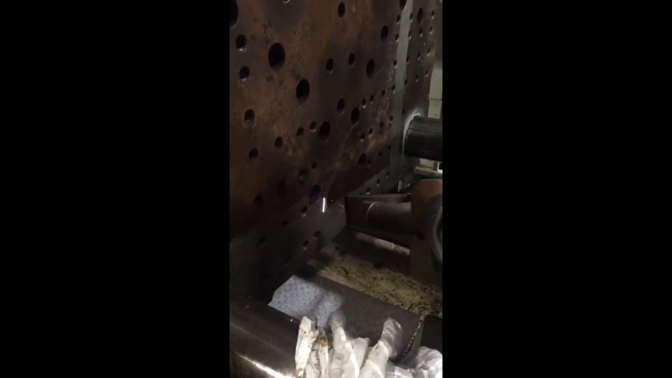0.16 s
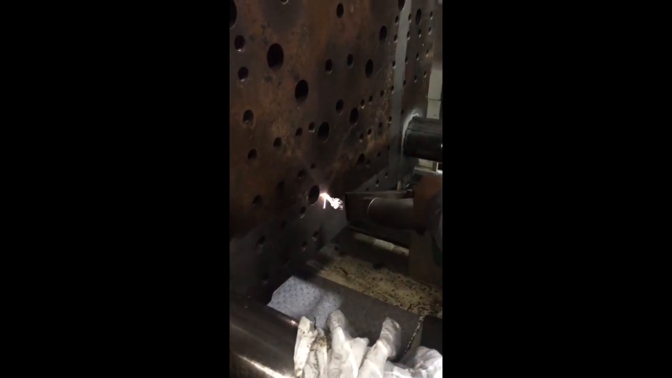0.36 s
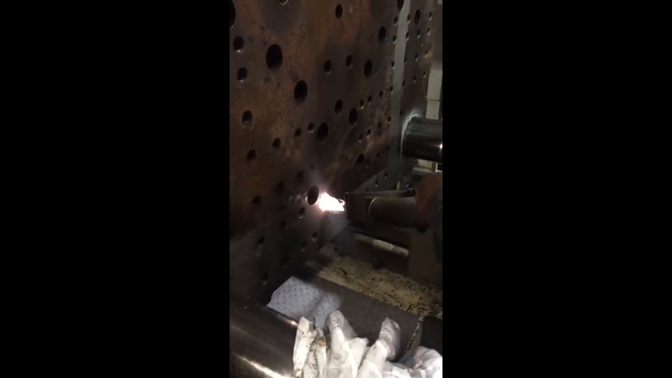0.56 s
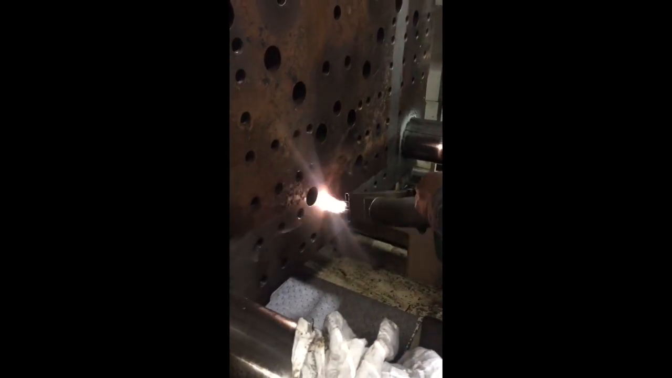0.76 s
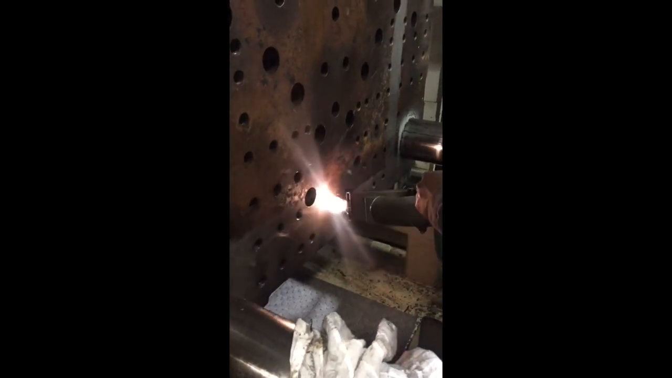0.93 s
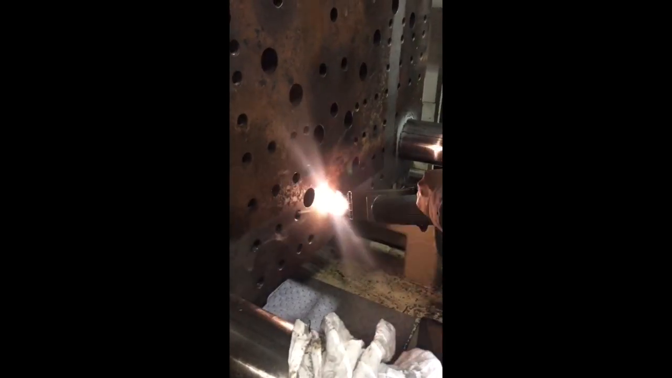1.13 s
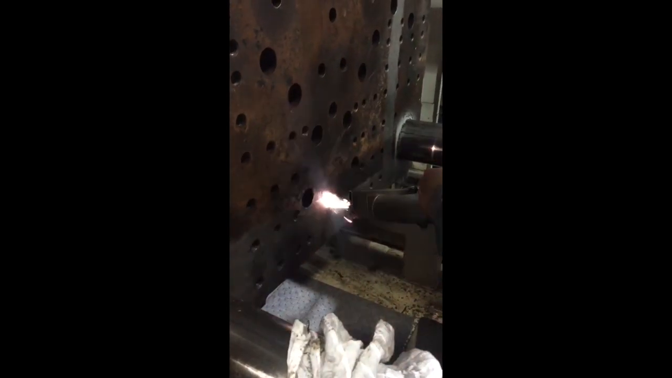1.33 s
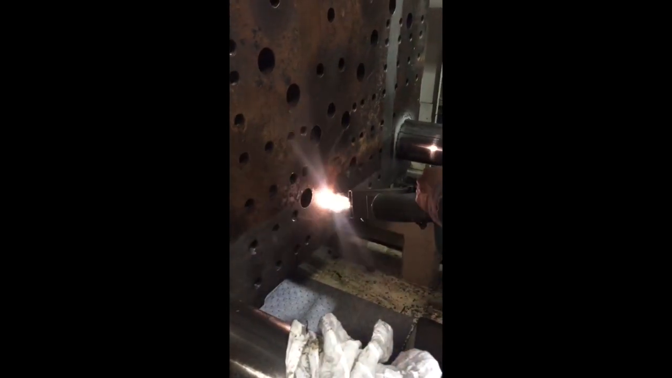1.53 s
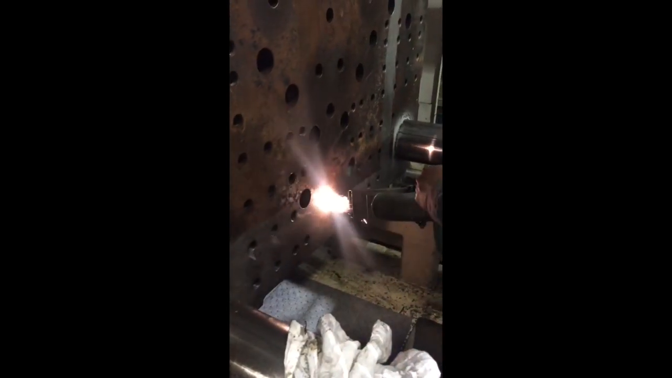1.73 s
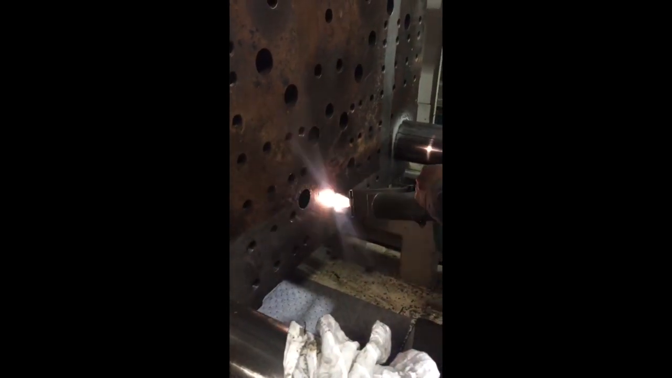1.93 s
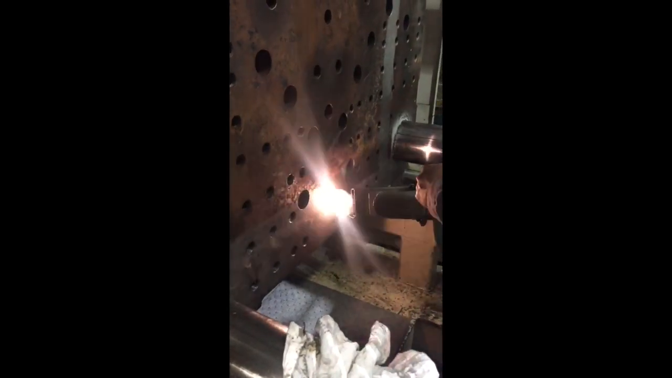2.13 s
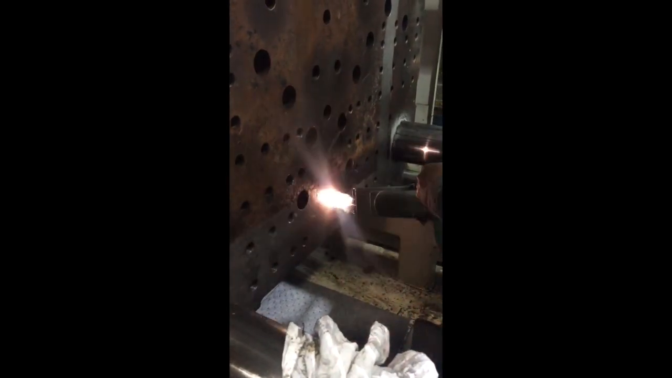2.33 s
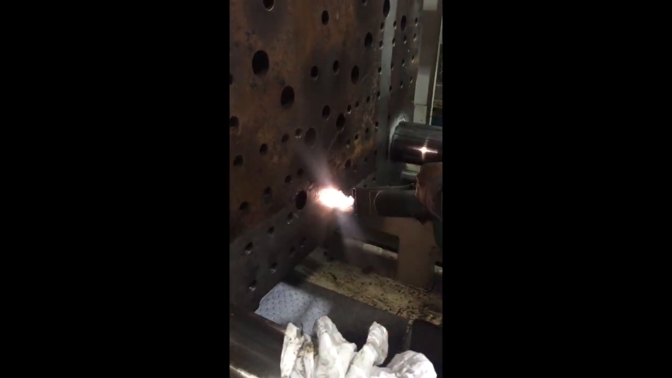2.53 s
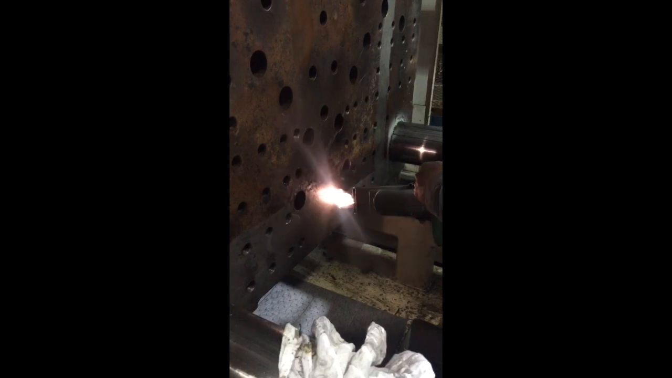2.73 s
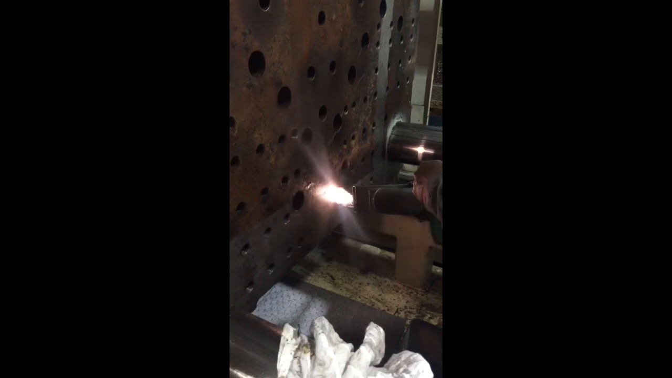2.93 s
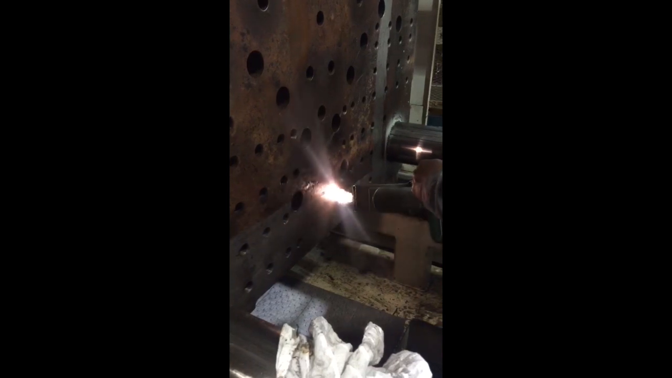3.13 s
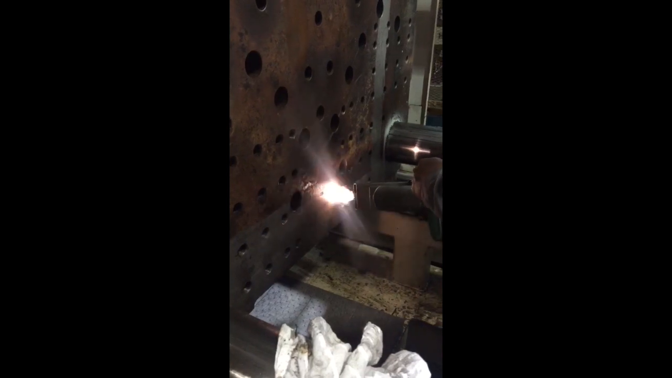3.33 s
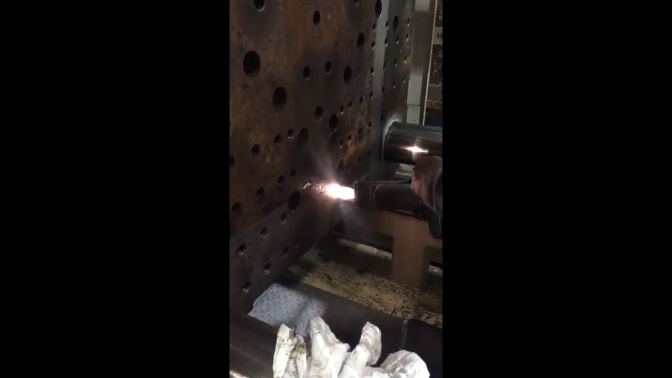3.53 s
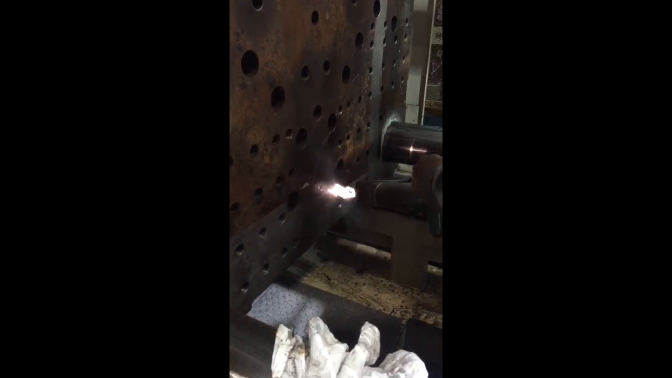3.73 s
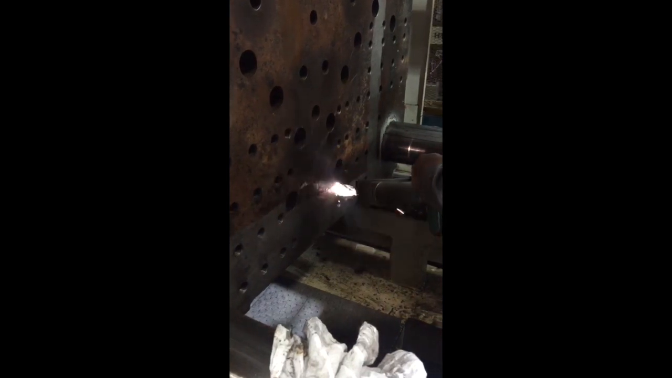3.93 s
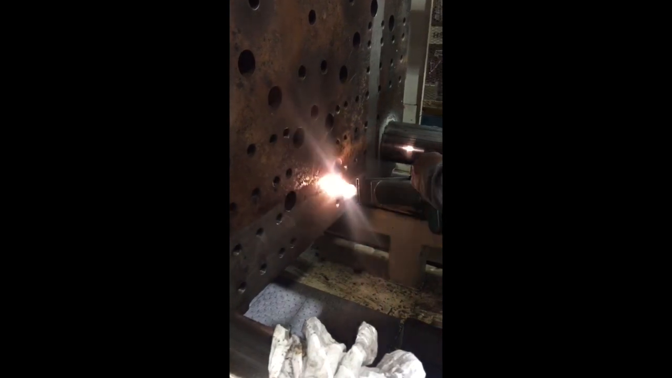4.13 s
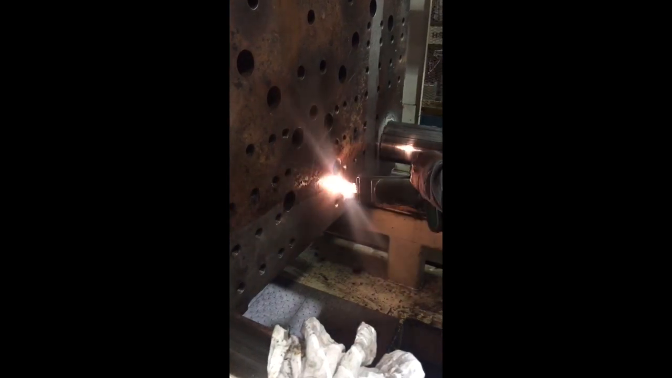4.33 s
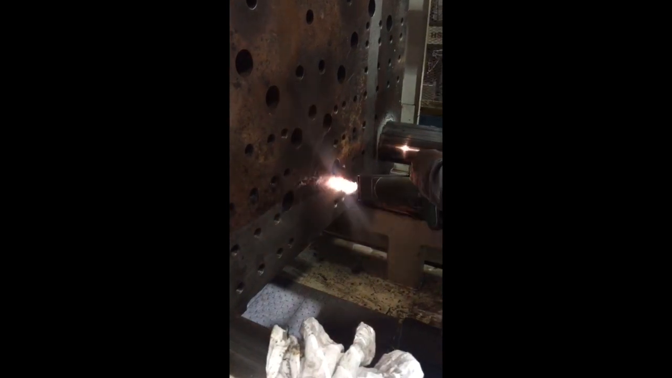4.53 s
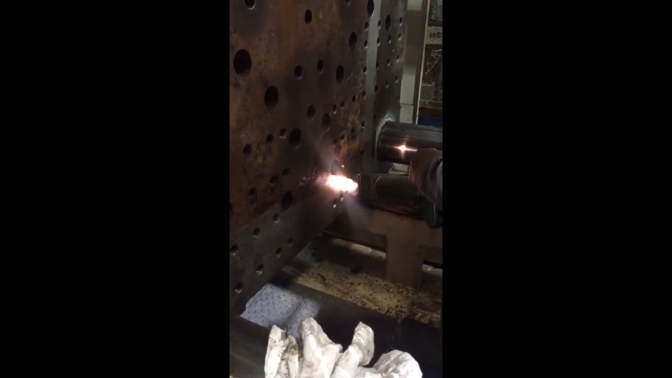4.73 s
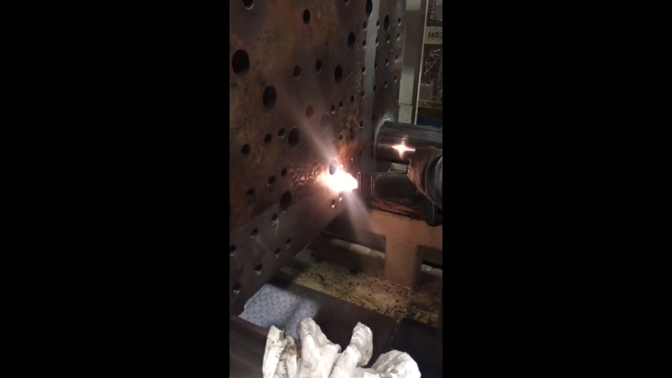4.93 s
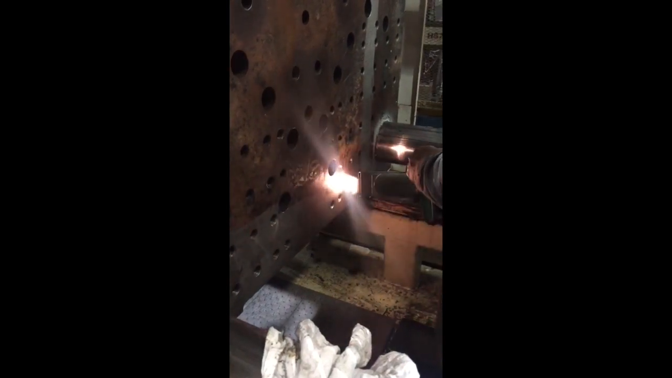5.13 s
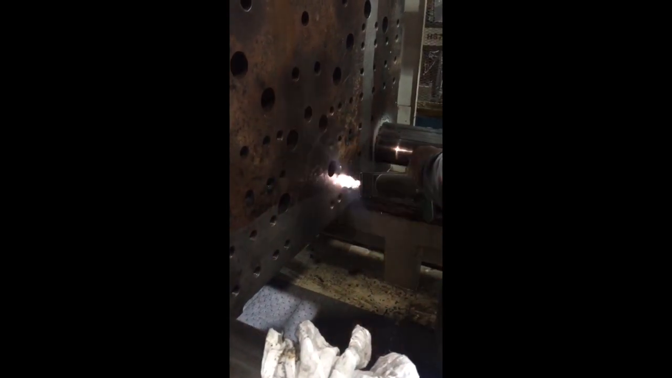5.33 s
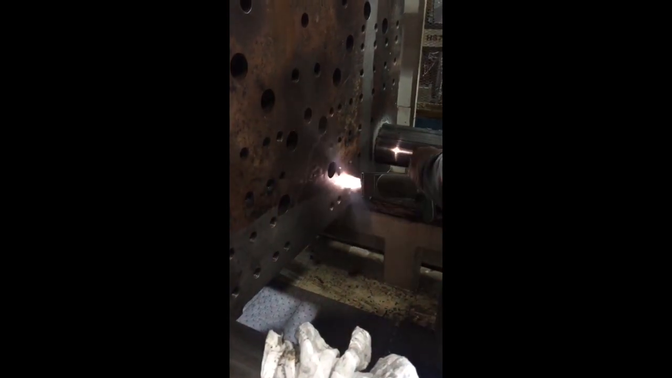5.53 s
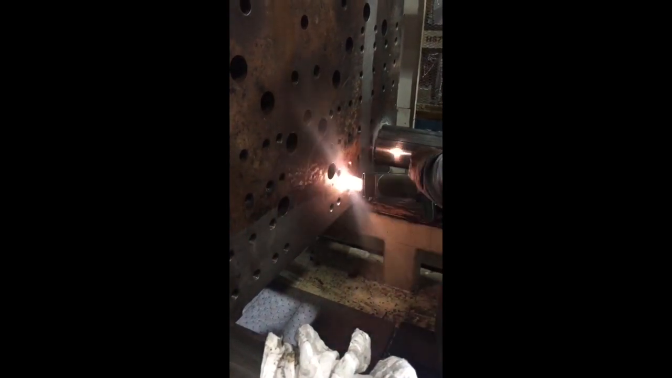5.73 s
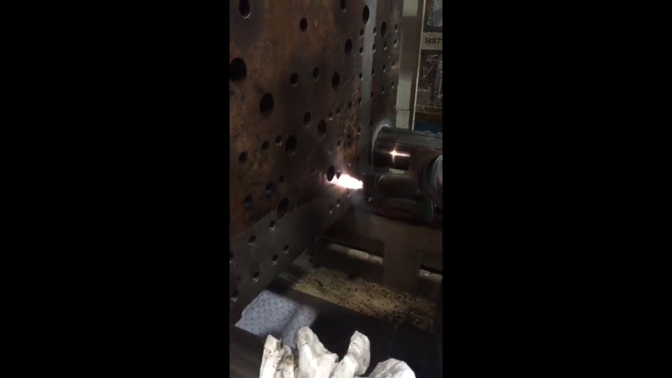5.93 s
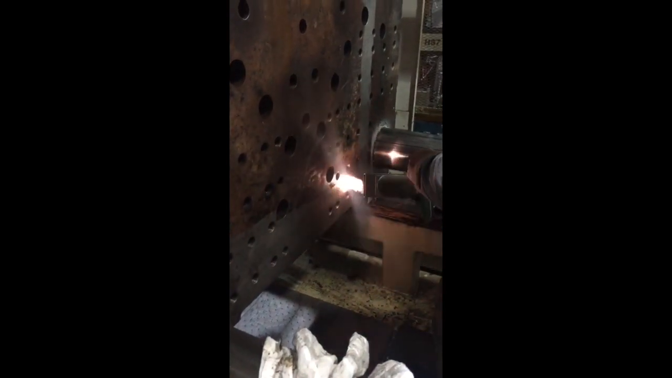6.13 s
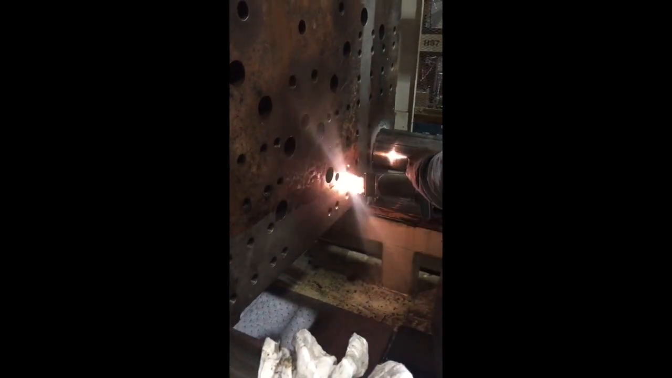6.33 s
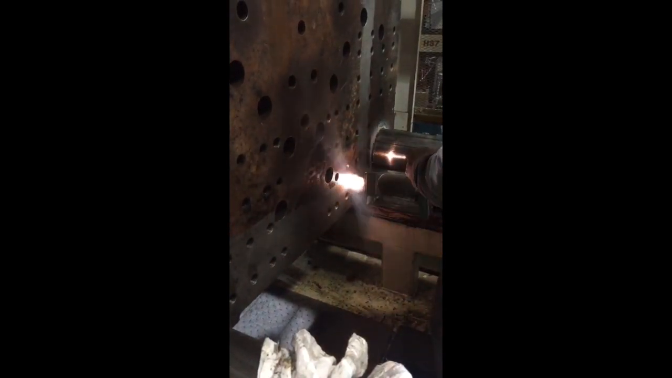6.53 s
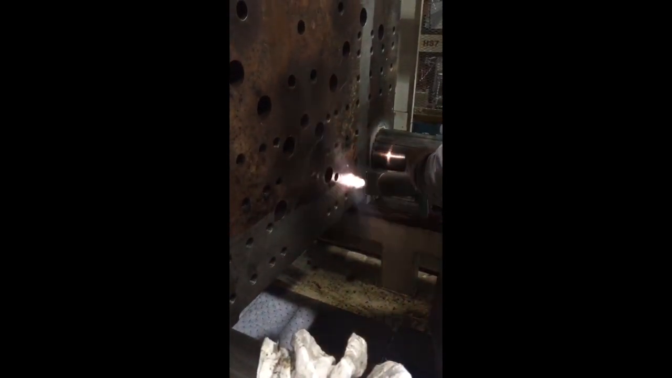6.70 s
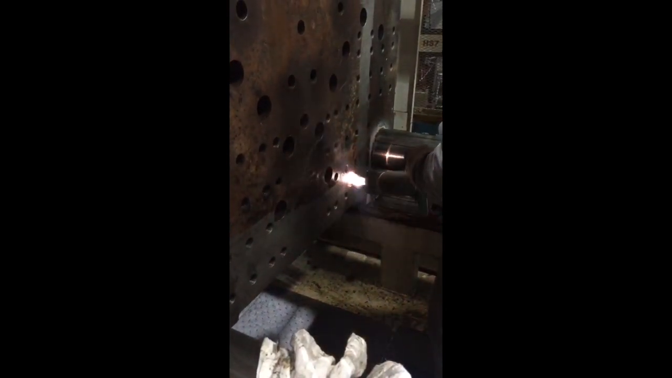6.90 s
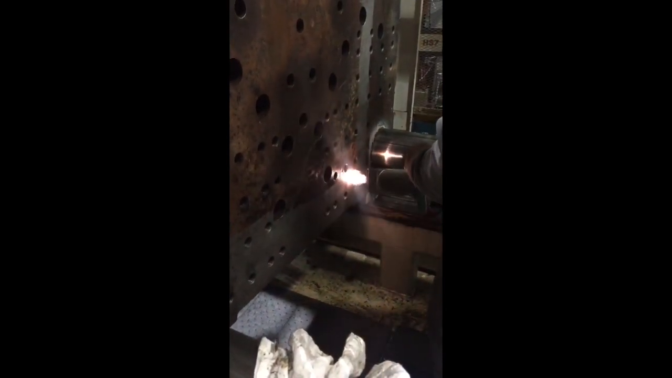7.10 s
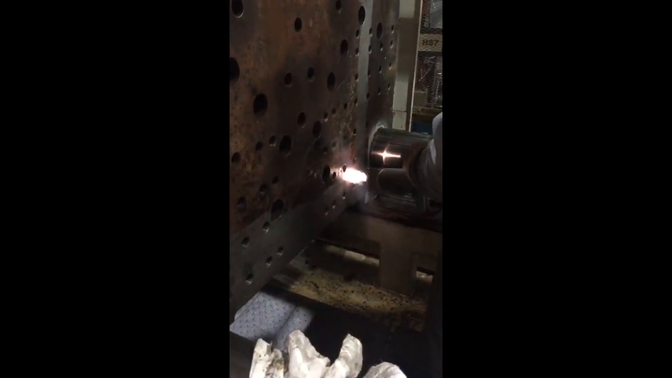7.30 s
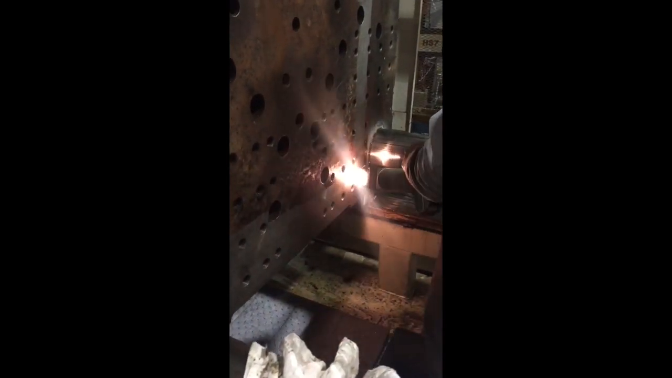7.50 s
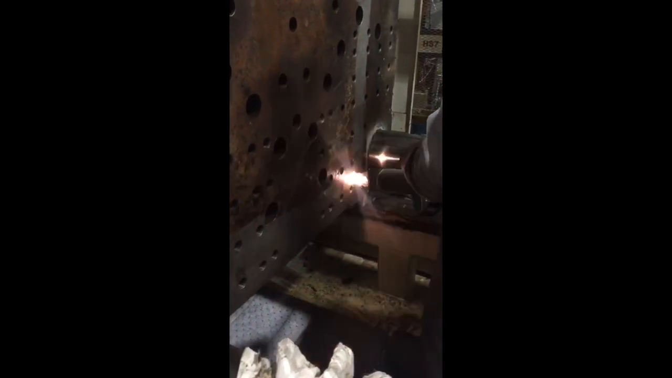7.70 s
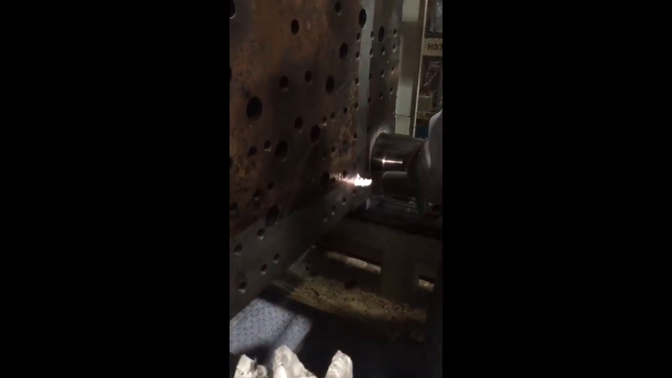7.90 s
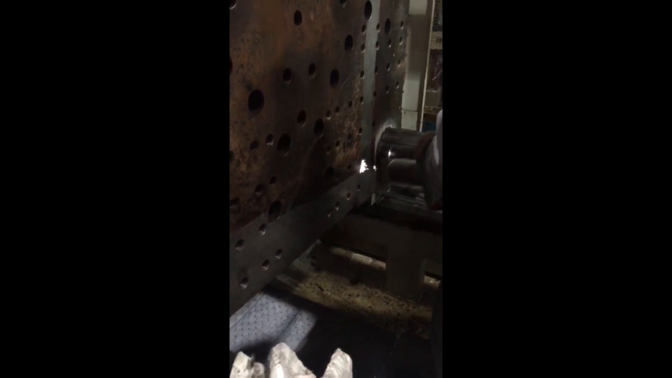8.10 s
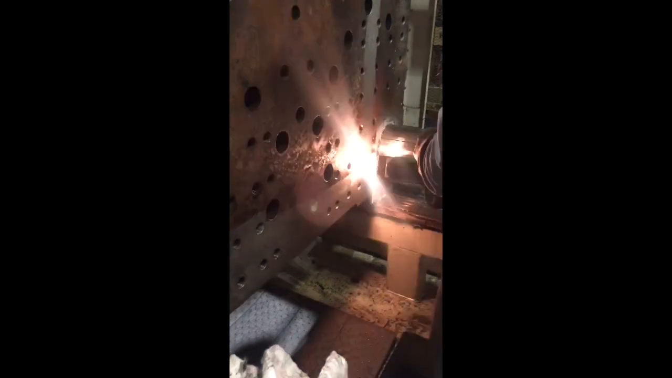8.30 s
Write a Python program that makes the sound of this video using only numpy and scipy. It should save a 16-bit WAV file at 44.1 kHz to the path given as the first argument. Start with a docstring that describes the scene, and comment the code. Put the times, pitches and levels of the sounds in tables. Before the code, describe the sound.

Very close in a nearly dry workshop, a handheld laser strips rust from steel. At 0 s a few short, shrill buzzing bites fade beneath rushing air and low wind buffeting; by 0.3 s the hiss is strong and hard rapid snaps and buzzing pulses begin. From 0.5 s a piercing whine near 10 kHz dominates, chopped about forty times a second into a harsh rasp, with fine sizzle, crackle and snaps. It is strongest around 0.6-1.2 s, with a dull knock at 1 s, while the air eases. Through 1.3-6 s it surges and dips irregularly over resonant hiss, faint machine tones and airy whistling. A loud flare and clustered knocks come at 6.35 s. More swells follow around 7.5 s, then the whine thins and stops at 8 s, leaving hiss. Air rises, buzzing bites return at 8.2 s, and a loud final flare with soft knocks ends near 8.45 s.

```python
"""Laser rust removal in a workshop

A hand-held pulsed laser strips rust from a steel plate. Each pulse pops off a speck of rust, so the pulse
rate sings as a high whine; a mirror sweeps the spot to and fro forty times a second and chops it into a buzz.
Shaped noise makes the air's hiss and rumble, the sizzle and sparks; filtered clicks make snaps at the turns;
sines make faint machine tones and, falling in pitch, a few dull knocks."""
import sys
import numpy as np
from scipy import signal
from scipy.fft import rfft, irfft, next_fast_len
from scipy.io import wavfile
from scipy.ndimage import uniform_filter1d, map_coordinates

SR = 44100
rng = np.random.default_rng(int(sys.argv[2]) if len(sys.argv) > 2 else 0)


def bounce(signal):
    """Save signal as a 16-bit WAV file at the path given by the first command-line argument."""
    frames = np.transpose(np.atleast_2d(signal))
    limited = np.clip(frames, -1, 1)
    pcm = np.round(limited * 32767).astype(np.int16)
    wavfile.write(sys.argv[1], SR, pcm)


N = 373086
TIME = np.arange(N) / SR


def from_db(db):
    """Level law: decibels to amplitude gain."""
    return 10 ** (np.asarray(db) / 20)


def rms_one(x):
    """Normalisation: scale to unit root mean square."""
    return x / np.sqrt(np.mean(np.abs(x) ** 2) + 1e-20)


def in_time(rows):
    """Linear interpolation: the columns after time, at every sample."""
    s, *columns = np.transpose(rows)
    return [np.interp(TIME, s, column) for column in columns]


def low_pass(x, hz, order=2):
    """Butterworth low-pass: a maximally flat pass band."""
    sections = signal.butter(order, min(hz, .45 * SR), fs=SR, output="sos")
    return signal.sosfilt(sections, x)


def coloured(x, spectrum, boosts=()):
    """Spectral shaping: a smooth spectrum with resonant bumps, scaled to rms 1."""
    size = next_fast_len(N)
    hz = np.maximum(np.arange(size // 2 + 1) * SR / size, 1)
    points = np.array(spectrum)
    # silent below the first point, level above the last
    db = np.interp(np.log(hz), np.log(points[:, 0]), points[:, 1], left=-np.inf)
    for centre_hz, width_hz, boost_db in boosts:
        db = db + boost_db / (1 + (2 * (hz - centre_hz) / width_hz) ** 2)
    return rms_one(irfft(rfft(x, size) * from_db(db), size)[:N])


def drift(per_s):
    """Slow random modulation: normal values of spread 1, joined by straight lines."""
    values = rng.standard_normal(1000)
    return np.interp(TIME * per_s, np.arange(len(values)), values)


def swell(s, db, half_length_s):
    """Gaussian envelope: the power of a bell-shaped rise and fall."""
    return from_db(db) ** 2 * np.exp(-np.minimum(((TIME - s) / half_length_s) ** 2, 40))


def workshop(x, wet_db=-24, t60=0.18):
    """Diffuse reverberation: exponentially decaying noise as a faint room tail."""
    age = TIME[:SR // 2]
    tail = rng.standard_normal(len(age)) * from_db(-60 * age / t60) * (age > .01)
    return x + from_db(wet_db) * signal.fftconvolve(x, tail / np.linalg.norm(tail))[:N]


# gusts of the air stream: (time [s], peak level [dB])
GUST_PEAKS = [(0, -46), (.23, -41.5), (.6, -38.5), (1.28, -43.5), (1.87, -43.5), (2.45, -47), (3.92, -53.5),
              (4.2, -54), (5.45, -57), (6.85, -57), (7.4, -53), (8.2, -53)]
GUST_ATTACK_S, GUST_HOLD_S, GUST_RELEASE_DB_PER_S = 0.008, 0.24, 148


def gusts():
    """Wind buffeting of the microphone: each gust's gain comes quickly, holds and dies away."""
    total = np.zeros(N)
    for s, db in GUST_PEAKS:
        attack = np.clip((TIME - s) / GUST_ATTACK_S, 0, 1)
        release_s = np.maximum(TIME - s - GUST_HOLD_S, 0)
        total += attack * from_db(db - GUST_RELEASE_DB_PER_S * release_s)
    return total


# the gap opens as the tool is drawn back, and its resonances sink: (time [s], pitch factor before wander [ratio])
GAP_PITCH = [(0, 1.01), (.2, 1), (.42, 1.004), (1.2, 1.003), (6.3, 1), (7.6, 1.02), (8.02, 1), (8.18, .99),
             (8.3, 0.94), (8.4, 0.99)]


def retuned(x, wander=0.005):
    """Cavity tuning: resampling shifts a noise's resonances as the gap changes."""
    speed = in_time(GAP_PITCH)[0] + wander * drift(2)
    return map_coordinates(x, [np.cumsum(speed)], order=3, mode="mirror")


# how the tool is held: (time [s], slant [0 = square, 1 = slanted])
TOOL_SLANT = [(1.0, 0.019), (3.5, 0.42), (6.3, 0.34), (7.0, 0.88), (7.9, 1.0), (8.2, 0.99), (8.35, 0.99)]
# air over the plate, before the trims in air(): (time [s], rush level [dB], hiss level [dB])
AIR_LEVELS = [(0.0, -42.5, -39.5), (0.16, -45, -40), (.245, -41.5, -35.5), (0.33, -39.5, -33),
              (0.64, -41, -36.5), (1.07, -50.5, -46.5), (1.3, -52, -49.5), (2.35, -56, -52.5),
              (2.87, -56, -53.5), (3.65, -55.5, -50.5), (5.07, -50, -48), (6.1, -53.5, -51.5),
              (6.39, -50.5, -49.5), (6.6, -55.5, -50), (7.63, -52, -47.5), (7.82, -56, -51.5),
              (8.19, -48.5, -41.5), (8.3, -45, -44), (8.46, -52, -47.5)]
# a whistling band of the air stream, before its trim: (time [s], level [dB])
WHISTLE_LEVELS = [(0, -55), (1.2, -57), (2.5, -56), (3.3, -50), (4.2, -45), (5.0, -45), (5.25, -48),
                  (5.5, -47), (6.3, -43.5), (6.5, -52), (6.9, -44.5), (7.8, -54.5), (8.22, -37.5),
                  (8.35, -56)]
# spectra of the air's low rumble: (frequency [Hz], relative level per Hz [dB])
RUMBLE_SPECTRUM = [(24, -45), (40, -9), (65, -1), (85, 2.5), (105, -2.5), (130, 2), (200, -3), (300, -10.5),
                   (500, -18), (1200, -33.5)]
# of its rush: (frequency [Hz], relative level per Hz [dB])
RUSH_SPECTRUM = [(150, -0.5), (350, 1), (650, 5), (1000, 1), (1400, -5.5), (1900, -1), (3000, -64),
                 (6000, -47)]
# of its hiss, before the gap's resonances: (frequency [Hz], relative level per Hz [dB])
HISS_SPECTRUM = [(800, -9.5), (1800, -7), (2500, -3), (3700, 0), (5100, -4.5), (6600, -4), (8500, 8),
                 (10500, 6), (12500, -3), (15500, -1.5)]
# of its whistling band: (frequency [Hz], relative level per Hz [dB])
WHISTLE_SPECTRUM = [(6300, -32), (6850, -6), (7180, 2), (7550, -11), (7950, -8), (8500, -23)]
# gap resonances, tool square, before retuning: (frequency [Hz], width [Hz], boost [dB])
SQUARE_GAP_MODES = [(974, 130, 13.5), (1296, 200, 13.5), (2150, 250, -3), (3080, 300, 14.5),
                    (3750, 400, -2.5), (4350, 320, 12.5), (4740, 210, 8.5), (5020, 200, -2),
                    (5380, 280, 10.5), (5800, 200, 1), (6230, 440, 11.5), (7160, 180, 4.5), (8500, 300, 3),
                    (10800, 600, -3.5), (12000, 450, 9.5)]
# gap resonances, tool slanted, before retuning: (frequency [Hz], width [Hz], boost [dB])
SLANTED_GAP_MODES = [(2200, 249, -5), (2500, 110, 6.5), (3040, 270, 9), (3720, 510, -6), (4400, 210, 6),
                     (4870, 82, 12), (4980, 130, -6), (5440, 350, 13.5), (5940, 220, 3), (6270, 240, 10.5),
                     (6660, 140, 10), (7900, 170, 6), (9100, 1500, 1), (11100, 400, -9), (11550, 250, 8),
                     (12160, 350, 8)]


def air(rumble_db=2.5, rush_db=-2.5, hiss_db=4.0, whistle_db=-3.0, lumpy_db=1.0, rush_uneven_db=1.8):
    """Turbulent jet noise: rumble on the plate, in step with its rush, and hiss resonating in the nozzle gap."""
    rush_level, hiss_level = in_time(AIR_LEVELS)
    slant = np.clip(in_time(TOOL_SLANT)[0], 0, 1)
    white = rng.standard_normal((5, N))

    rumble_gain = np.hypot(from_db(rush_level + rumble_db), gusts()) * from_db(lumpy_db * drift(25))
    rumble = rumble_gain * coloured(white[0], RUMBLE_SPECTRUM)
    rush_gain = from_db(rush_level + rush_db + rush_uneven_db * drift(14))
    rush = rush_gain * coloured(white[1], RUSH_SPECTRUM)

    # equal-power blend of the two ways of holding the tool
    square = np.sqrt(1 - slant) * coloured(white[2], HISS_SPECTRUM, SQUARE_GAP_MODES)
    slanted = np.sqrt(slant) * coloured(white[4], HISS_SPECTRUM, SLANTED_GAP_MODES)
    hiss = from_db(hiss_level + hiss_db) * retuned(square + slanted)

    whistle_gain = from_db(in_time(WHISTLE_LEVELS)[0] + whistle_db)
    whistle = whistle_gain * coloured(white[3], WHISTLE_SPECTRUM)
    return rumble + rush + hiss + whistle


# a gap resonance near 3 kHz rises as the tool returns to the plate: (time [s], frequency [Hz], level [dB])
RISING_RESONANCE = [(7.95, 3000, -71), (8.17, 3090, -57), (8.33, 3440, -55), (8.44, 3500, -64)]
RISING_CUTOFF_HZ = 104   # the band reaches this far to each side of its centre


def rising_hiss():
    """Heterodyning: low-passed complex noise on a gliding carrier is a rising band of hiss."""
    hz, db = in_time(RISING_RESONANCE)
    noise = rng.standard_normal(N) + 1j * rng.standard_normal(N)
    band = rms_one(low_pass(noise, RISING_CUTOFF_HZ))
    carrier = np.exp(2j * np.pi * np.cumsum(hz) / SR)
    return np.sqrt(2) * from_db(db) * (band * carrier).real


# faint machine tones, mostly overtones of the mirror's sweep; levels before swell and waver:
# (frequency [Hz], rms level held square [dB], rms level held slanted [dB])
MACHINE_TONES = [(398.4, -68, -78), (559.9, -73, -68), (677.3, -64.5, -78), (1035.9, -59.5, -84),
                 (1354.6, -69, -73), (1434.3, -65, -85), (1514, -68, -76), (1912.4, -68, -80),
                 (232.6, -69, -66), (2073, -73, -72), (2406, -71, -72), (2550, -72, -80)]
# a thin whistle swells as the air stream eases; level before waver:
# (time [s], peak rms level [dB], half length to 1/e power [s])
THIN_WHISTLE_SWELL = (0.85, -57.5, 0.3)
THIN_WHISTLE_HZ = 1912


def machine(waver_db=4.0, follows_air=0.37, wobble_turns=0.1):
    """Additive synthesis: unsteady tones swell with the air stream; tilting the tool shifts their balance."""
    slant = np.clip(in_time(TOOL_SLANT)[0], 0, 1)
    hiss_level = in_time(AIR_LEVELS)[1]
    swell_db = follows_air * (hiss_level - np.median(hiss_level))
    tones = [(THIN_WHISTLE_HZ, np.sqrt(swell(*THIN_WHISTLE_SWELL)))]
    for hz, square_db, slanted_db in MACHINE_TONES:
        tilted_db = square_db + (slanted_db - square_db) * np.sqrt(slant)
        tones.append((hz, from_db(tilted_db + swell_db)))
    out = np.zeros(N)
    for hz, gain in tones:
        turns = hz * TIME + rng.random() + wobble_turns * drift(14)
        out += np.sqrt(2) * gain * from_db(waver_db * drift(5)) * np.sin(2 * np.pi * turns)
    return out


# dull knocks: (time [s], level of the falling tone [dB], decay to 1/e [s])
KNOCK_BLOWS = [(0.9988, -23.5, 0.01), (6.357, -26, 0.015), (6.3798, -34, .008), (6.412, -39, .008),
               (8.313, -32, 0.018), (8.343, -37, 0.011)]


def knocks(turns=0.546, onset_s=0.00034, crack_db=3, crack_s=0.00076):
    """Bending-wave dispersion in steel: after the crack the highs arrive first, so each knock falls in pitch."""
    out, grit = np.zeros(N), low_pass(rng.standard_normal(N), 5300)
    for s, db, decay_s in KNOCK_BLOWS:
        age = np.maximum(TIME - s, 0)
        falling = np.sin(2 * np.pi * turns * np.log1p(age / onset_s))
        bending = falling * np.exp(-np.minimum(age / decay_s, 20))
        crack = from_db(crack_db) * grit * (age > 0) * np.exp(-np.minimum(age / crack_s, 20))
        out += from_db(db) * (crack - bending)
    return out


# brief narrow bursts of overload noise near 4.6 kHz when the loud whine returns: (time [s], peak rms level [dB])
OVERLOAD_TIMES = [(8.289, -39), (8.315, -36.5)]
OVERLOAD_HALF_S = 0.0045   # to 1/e power
# colour of the bursts: (frequency [Hz], relative level per Hz [dB])
OVERLOAD_SPECTRUM = [(4000, -25), (4560, 1), (5050, -22)]


def overload_bursts():
    """Gated band noise: short bursts of overload noise under Gaussian envelopes."""
    power = sum(swell(s, db, OVERLOAD_HALF_S) for s, db in OVERLOAD_TIMES)
    return np.sqrt(power) * coloured(rng.standard_normal(N), OVERLOAD_SPECTRUM)


# the beam is on the rust: (start [s], end [s])
RUST_SPANS = [(0.481, 8.0), (8.255, 8.47)]
# the plume flares each time the hand brings the spot onto fresh rust; level before flicker:
# (time [s], peak level [dB], half length to 1/e power [s])
PLUME_FLARES = [(0.602, -19, 0.091), (0.852, -16.5, 0.12), (1.001, -24, 0.025), (1.17, -18, 0.11),
                (1.587, -22.5, 0.15), (1.837, -22.5, .1), (2.186, -21.5, 0.2), (2.574, -24.5, 0.079),
                (2.86, -23, 0.16), (3.307, -23, 0.21), (3.63, -22, 0.098), (4, -28.5, 0.16),
                (4.355, -23.5, 0.18), (4.75, -26, 0.15), (5.056, -20, 0.14), (5.27, -20.5, 0.059),
                (5.566, -22.5, 0.053), (5.79, -23.5, 0.31), (6.344, -17.5, 0.11), (6.563, -25, 0.097),
                (7.006, -24.5, 0.22), (7.426, -19.5, 0.091), (7.635, -19.5, 0.095), (7.96, -33.5, 0.037),
                (8.322, -15.5, 0.084)]
BARE_DB = -35.5   # burn on steel that is already clean


def burn(flicker_db=0.98):
    """Power addition: flares over a low base give the burn gain; none while the beam is off the rust."""
    on = sum((TIME >= start) & (TIME <= end) for start, end in RUST_SPANS)
    power = from_db(BARE_DB) ** 2 + sum(swell(*flare) for flare in PLUME_FLARES)
    return on * np.sqrt(power) * from_db(flicker_db * drift(22))


# snaps and sizzle take only a share of the burn's swing about its usual level
USUAL_BURN_DB, SNAP_FOLLOWS, SIZZLE_FOLLOWS = -23, 0.67, .8


def steadied(burn_gain, share):
    """Level compression: follow only a share of the burn's swing in dB."""
    usual = from_db(USUAL_BURN_DB)
    return usual * (burn_gain / usual) ** share


SPARKS_PER_S, SPARK_DB = 1400, -29.5   # level relative to the burn
# colour of the bursting flakes: (frequency [Hz], relative level per Hz [dB])
SPARK_SPECTRUM = [(400, 1), (1200, 1), (4000, 3), (8000, -11.5), (15000, 1.5)]


def sparks(burn_gain, size_db=4.0):
    """Random shot noise: flakes of rust burst under the beam in a fine, dense crackle."""
    born = rng.random(N) < SPARKS_PER_S / SR
    sizes = from_db(size_db * np.minimum(rng.exponential(1, N), 4)) * rng.choice([-1, 1], N)
    return from_db(SPARK_DB) * burn_gain * coloured(born * sizes, SPARK_SPECTRUM)


SWEEP_HZ, FIRST_TURN_S = 39.8418, .02008


def since_turn(delay_s):
    """Cyclic motion: seconds since the mirror last passed a given moment of its cycle."""
    return (TIME - FIRST_TURN_S - delay_s) % (1 / SWEEP_HZ)


def relief(place, ridges=7.01, renew_per_s=5.0, slide=0.18, depth_db=3.5, steepness=0.83):
    """Surface scanning: pits dim the burn on the way out and back, and slide as the hand moves."""
    surface = rng.standard_normal((64, 64))
    along = ridges * (1 + place + slide * drift(3))
    height = map_coordinates(surface, [renew_per_s * TIME, along], order=2, mode="mirror")
    return from_db(depth_db * np.tanh(steepness * np.minimum(height, 0)))


# part of the swept line in focus; places are shares of the line, 0 = near end, 1 = far end:
# (time [s], centre [share of line], half width [share of line])
FOCUS_SPOT = [(.48, 0.49, 0.67), (.87, 0.11, 0.61), (.97, .02, 0.44), (1.025, 0.02, 0.34), (1.06, .1, 0.48),
              (1.13, 0.28, 0.83), (1.95, .25, 0.52), (2.25, 0.81, 0.57), (2.75, 0.38, 0.65),
              (2.88, 0.02, 0.45), (3.0, .02, 0.5), (3.3, 0.34, 0.61), (4.0, 0.31, 0.54), (4.67, 0.63, 0.36),
              (5.3, 0.22, 0.52), (5.9, 0.22, 0.47), (6.15, 0.13, 0.69), (6.35, 0.8, 0.48),
              (6.8, 0.15, 0.58), (7.6, 0.51, 0.41), (7.72, 0.63, 0.2), (7.84, 0.68, 0.1), (8.0, 0.76, 0.12),
              (8.255, 0.89, 0.46), (8.46, 0.28, 0.46)]


def sweep(near_pause_s=0.001177, far_width=0.14, far_dip=0.42, edge_hz=3000, pause_wander=0.19):
    """Triangular scanning: the spot's place on its line, its focus, and its blanking at both ends."""
    place = 1 - np.abs(2 * SWEEP_HZ * since_turn(near_pause_s / 2) - 1)
    centre, half_width = in_time(FOCUS_SPOT)
    offset = (place - centre) / half_width
    focus = np.exp(-offset ** 4 / 2) * relief(place)
    pause_s = near_pause_s * (1 + pause_wander * drift(10))
    near = np.clip((pause_s - since_turn(0)) * SR, 0, 1)
    far = np.exp(-((1 - place) / far_width) ** 2)
    shutter = low_pass(1 - near - far_dip * far, edge_hz)
    return place, focus, shutter


# runs of hard snaps, where one end of the line lies on a thick crust; level of the clicks before
# unevenness and filtering: (time [s], peak level [dB], half length to 1/e power [s], end of the line)
CRUST_RUNS = [(0.362, 4, 0.017, "near"), (0.44, -13, .03, "near"), (.71, -10, 0.093, "near"),
              (0.833, -6, 0.068, "near"), (1.01, -9.5, 0.035, "near"), (1.248, -20, .025, "near"),
              (1.596, -21, 0.098, "near"), (1.88, -17, 0.045, "near"), (2.04, -15, .06, "near"),
              (2.94, -16, 0.038, "near"), (3.178, -13, 0.023, "near"), (3.245, -16.5, .03, "near"),
              (3.393, -20.5, .04, "near"), (3.55, -15, 0.043, "near"), (3.69, -20.5, .05, "near"),
              (4.21, -18, 0.051, "near"), (4.84, -18, 0.078, "near"), (5.64, -17, 0.11, "near"),
              (5.993, -17.5, .06, "near"), (6.215, -19, 0.029, "near"), (6.5, -21, .035, "near"),
              (6.87, -20.5, .07, "near"), (7.07, -20, 0.14, "near"), (7.359, -18, .05, "near"),
              (0.601, -3, 0.04, "far"), (1.153, -20, .05, "far"), (2.24, -29, .08, "far"),
              (8.226, -10.5, 0.023, "far")]


def crust(end):
    """Power addition: the gain of the hard snaps at one end of the line."""
    return np.sqrt(sum(swell(*run) for *run, where in CRUST_RUNS if where == end))


def ring(clicks, modes):
    """Modal resonance: clicks set decaying sines ringing."""
    out = 0
    for hz, db, t60 in modes:
        radius = from_db(-60 / (t60 * SR))
        angle = 2 * np.pi * hz / SR
        poles = [1, -2 * radius * np.cos(angle), radius * radius]
        out = out + from_db(db) * signal.lfilter([0, np.sin(angle)], poles, clicks + 1e-18)
    return out


# the vapour snaps as the beam cuts out at each end of its line; click level over the steadied burn
NEAR_SNAP_DB, FAR_SNAP_DB = 0, -9
# the plate's answer to a snap: (frequency [Hz], level relative to the click [dB], t60 [s])
PLATE_MODES = [(1060, -49, 0.0077), (1460, -53, 0.0048), (1950, -41, 0.014), (3100, -39, 0.0069),
               (4180, -31.5, 0.0097), (4820, -38, .008)]
# notches that reflections off the nozzle cut into the snaps: (frequency [Hz], width [Hz])
NOZZLE_NOTCHES = [(1140, 63), (2140, 120), (5050, 150)]


def snaps(burn_gain, uneven_db=1.7, restart_s=0.00138, restart_db=-9, brightness=0.048, reach=0.83):
    """Impulse excitation: a sharp snap at each turn of the mirror, a softer one as the beam takes hold again."""
    clicks = np.zeros(N)
    # snaps fade when the focus is too narrow to reach the ends
    reached = np.minimum(in_time(FOCUS_SPOT)[1] / reach, 1) ** 2
    for end, db, delay_s in (("near", NEAR_SNAP_DB, 0), ("far", FAR_SNAP_DB, .5 / SWEEP_HZ)):
        turn = np.diff(since_turn(delay_s), prepend=0) < 0
        ordinary = from_db(db) * steadied(burn_gain, SNAP_FOLLOWS) * reached
        clicks += turn * np.hypot(ordinary, crust(end)) * from_db(uneven_db * drift(40))
    lag = round(restart_s * SR)
    clicks[lag:] += from_db(restart_db) * clicks[:-lag]
    out = signal.lfilter([1, -brightness], [1], clicks) + ring(clicks, PLATE_MODES)
    for hz, width_hz in NOZZLE_NOTCHES:
        out = signal.lfilter(*signal.iirnotch(hz, hz / width_hz, fs=SR), out)
    return out


def rust(memory):
    """Autoregression from sweep to sweep: memory sets how nearly each meets the same roughness again."""
    period = round(SR / SWEEP_HZ)
    run_in = 40   # sweeps
    fresh = rng.standard_normal((N // period + 1 + run_in, period))
    surface = signal.lfilter([1], [1, -memory], fresh, axis=0)
    return rms_one(surface[run_in:].ravel()[:N])


# the beam only grazes its focus and bites once a sweep; levels before echoes and blanking:
# (first bite [s], end [s], peak level [dB], loss per bite [dB], bite length to 1/e [s])
GRAZING_BITES = [(.0015, 0.062, -10.5, 5.5, 0.0027), (0.01, .05, -16, 7, 0.0063),
                 (0.067, .11, -13.5, 5, 0.002), (0.073, .085, -10.5, 0, 0.002),
                 (0.3204, 0.488, -12.5, -0.4, 0.0053), (8.017, 8.1, -29, 3, .002),
                 (4.621, 4.76, -21, 0, 0.0032), (8.213, 8.255, -8.5, -1.5, 0.0048)]


def bites(rise_s=0.000058):
    """Periodic gating: a brief bite each time the sweep passes the one place in focus."""
    out = np.zeros(N)
    for start, end, db, loss_db, length_s in GRAZING_BITES:
        during = (TIME >= start) & (TIME < end)
        passes, age = np.divmod(TIME[during] - start, 1 / SWEEP_HZ)
        shape = np.minimum(age / rise_s, 1) * np.exp(-np.minimum((age / length_s) ** 2, 20))
        out[during] += from_db(db - loss_db * passes) * shape
    return out


def steel_echoes(wave, echo_db=-18, hand_turns=0.28, count=8):
    """Multipath interference: nearby steel returns the whine; echo phases wander as the hand moves."""
    out = wave.astype(complex)
    for lag in (np.geomspace(.0012, .022, count) * SR).astype(int):
        turn = np.exp(2j * np.pi * (rng.random() + hand_turns * drift(2.8)))
        out[lag:] += from_db(echo_db) * (turn[lag:] * wave[:-lag])
    return out


def evened(wave):
    """Automatic levelling: divide by the running rms over two sweeps."""
    power = uniform_filter1d(np.abs(wave) ** 2, 2 * round(SR / SWEEP_HZ))
    return wave / np.sqrt(power + 1e-6)


PULSE_HZ = 9887.3
# sizzle of the rust: (frequency [Hz], relative level per Hz [dB])
SIZZLE_SPECTRUM = [(5000, -33), (7500, -16), (8200, -15), (8700, -0.5), (9100, 0.5), (9500, 9), (9900, 14),
                   (10300, -13), (10700, -8), (11200, -4.5), (11600, -25), (12500, -12.5), (15500, -31)]
# coarseness of the rust under the beam: (time [s], extra sizzle [dB])
RUST_COARSENESS = [(.6, 7), (.85, -0.5), (3.3, 2.5), (4.0, -1.5), (4.25, 5), (4.55, 0), (4.8, 5.5),
                   (5.1, 2.5), (5.27, -0.5), (5.6, 0), (6.55, 2), (7.0, -1), (7.42, 1.5), (7.65, -1),
                   (7.85, 4.5), (8.3, 1)]
# (frequency [Hz], relative level per Hz [dB])
PUFF_SPECTRUM = [(200, 6.0), (650, 4.5), (1500, -4.0), (2200, -4), (4000, -1.0), (15000, -6.5)]


def laser(burn_gain, patch_hz=170, patchy=0.27, sizzle_db=-11.5, sizzle_uneven_db=0.6, bite_grit=0.85,
          crackle_db=-20.0, idle_db=-44, spit=0.8, crust_spit=2.7, spit_s=0.0046, path_turns=0.24):
    """Amplitude and phase modulation: the pulse tone is chopped by the sweep and roughened by the rust."""
    place, focus, shutter = sweep()
    pulses = np.sqrt(2) * np.exp(2j * np.pi * PULSE_HZ * TIME)

    # thick and thin patches of rust change the strength and timing of the pops
    patches = rms_one(low_pass(rust(memory=0.94) + 1j * rust(memory=0.56), patch_hz))
    whine = burn_gain * evened(steel_echoes(focus * shutter * (1 + patchy * patches)))
    # the path to the microphone lengthens and shortens as the spot travels
    whine = whine * np.exp(2j * np.pi * path_turns * place)
    # out of focus the beam still sings faintly
    whine = whine + from_db(idle_db) * shutter * (1 + patches / 2)

    # fine grain spreads the tone into a wide skirt of side tones
    grain = coloured(low_pass(rust(memory=0.37), 4300, order=4) * pulses.real, SIZZLE_SPECTRUM)
    # the spot spits most where it lingers on a crust at the turn
    near_crust = crust("near")
    spitting = spit + crust_spit * near_crust / (near_crust + burn_gain)
    burning = evened(focus * (0.33 + shutter + spitting * np.exp(-since_turn(0) / spit_s)))
    sizzle_gain = from_db(sizzle_db + in_time(RUST_COARSENESS)[0] + sizzle_uneven_db * drift(12))
    sizzle = sizzle_gain * steadied(burn_gain, SIZZLE_FOLLOWS) * burning

    bite = bites() / np.sqrt(2)
    tone = ((whine + steel_echoes(bite * shutter)) * pulses).real
    # the puffs of vapour also buzz faintly at multiples of the sweep rate
    puffs = coloured(rust(memory=0.98), PUFF_SPECTRUM)
    crackle = from_db(crackle_db) * (sizzle + .5 * bite) * puffs
    return tone + (sizzle + bite_grit * bite) * grain + crackle


def scene():
    """Superposition of all sources at one close microphone; air and machine tones bypass the room."""
    burn_gain = burn()
    cleaning = laser(burn_gain) + snaps(burn_gain) + sparks(burn_gain) + overload_bursts()
    background = air() + rising_hiss() + machine()
    return (workshop(cleaning + knocks()) + background)[None]


CUTOFF_HZ = 15850


def record(dry, top=0.66):
    """Soft saturation and band limiting: the highest peaks are rounded off and the top is cut."""
    rounded = dry / (1 + (dry / top) ** 6) ** (1 / 6)
    return signal.sosfilt(signal.ellip(12, .1, 80, CUTOFF_HZ, fs=SR, output="sos"), rounded)


dry = scene()
out = record(dry)
bounce(out)
```